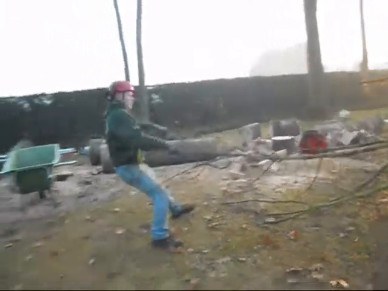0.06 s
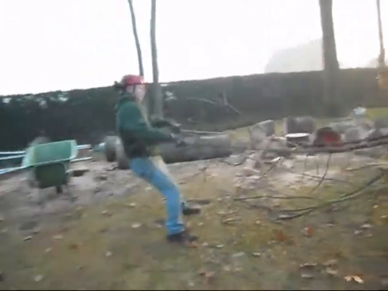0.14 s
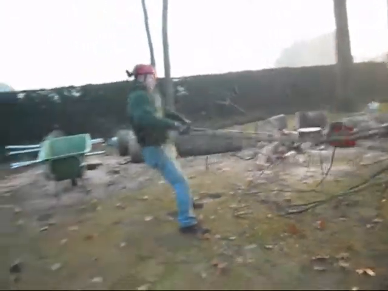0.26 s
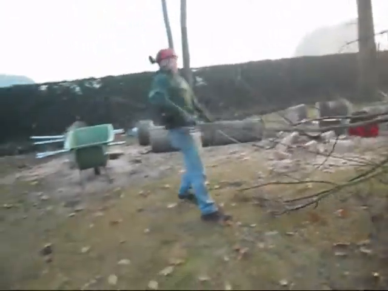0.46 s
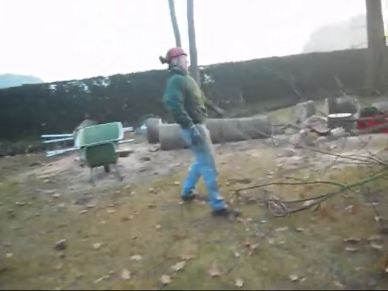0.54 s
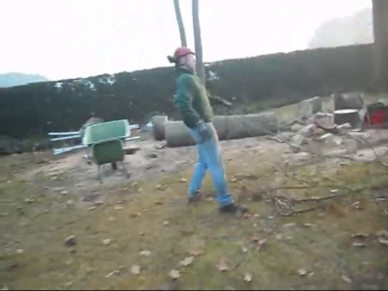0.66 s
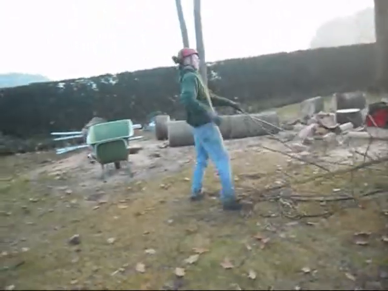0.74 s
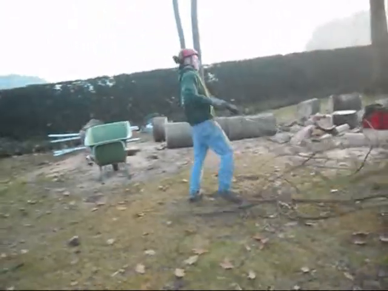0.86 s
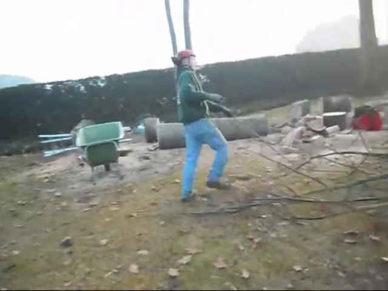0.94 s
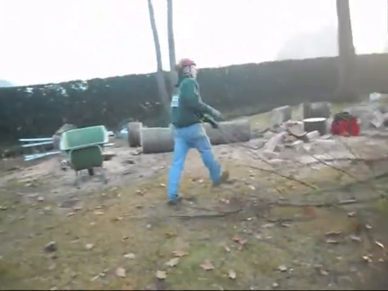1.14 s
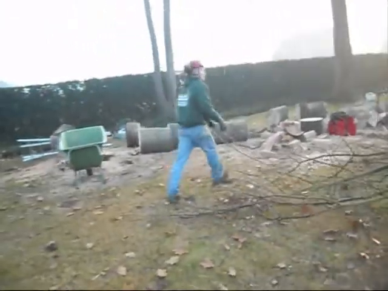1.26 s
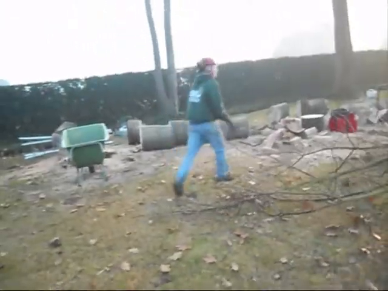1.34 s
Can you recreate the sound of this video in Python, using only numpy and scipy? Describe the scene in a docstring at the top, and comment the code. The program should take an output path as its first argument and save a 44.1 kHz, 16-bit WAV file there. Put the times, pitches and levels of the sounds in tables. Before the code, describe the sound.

A branch breaks outdoors: twigs and leaves swish louder with a few small snaps until one sharp, splintering crack at about 0.4 seconds. The rustle and wind drop right after it. From 0.65 to 0.95 seconds the limb lands with soft low thuds and crunching snaps. A few last twigs break until about 1.1 seconds, as faint wind in the trees and on the microphone slowly returns.

```python
"""Felled branch landing in a yard.

Twigs and leaves swish louder and louder until the wood breaks with one sharp crack: tearing fibres
drive a knock, a ring and a splinter hiss. The limb lands with low thuds and a crunch of snaps,
then a few last twigs break. Wind rushes in the trees and buffets the microphone. After the crack the
recorder's automatic gain, drawn into the level curves, ducks wind and rustle; the wind slowly recovers."""
import sys
import numpy as np
from scipy import signal
from scipy.fft import rfft, irfft
from scipy.io import wavfile

SR = 44100
rng = np.random.default_rng(int(sys.argv[2]) if len(sys.argv) > 2 else 0)


def to_wav(s):
    """Save 16-bit WAV."""
    ch = np.atleast_2d(s).T  # columns
    pcm = np.round(np.clip(ch, -1, 1) * 32767)  # PCM
    wavfile.write(sys.argv[1], SR, pcm.astype(np.int16))


N = 61739
MIC_EDGE_HZ = 10700

# Wood fractures: t/s, split decay/s, knock f/Hz, knock level/dB,
# ring f/Hz, ring width/Hz, ring level/dB, splinter level/dB
FRACTURES = [(0.2261, 0.0071, 910, -31, 3350, 2000, -26, -22),
             (0.3214, 0.0035, 800, -26, 3060, 1200, -20.5, -27),
             (0.3332, 0.0011, 1200, -29, 3000, 1200, -20, -29),
             (.3350, .0003, 1210, -31, 4640, 2200, -15.5, -21.5),
             (0.3378, 0.0017, 1300, -28, 5500, 1500, -22.5, -19.5),
             (0.364, .001, 1100, -33, 6030, 2000, -28, -26),
             (0.3932, 0.00042, 1060, -17.5, 4300, 1280, -2.5, -20),
             (0.3944, 0.0021, 1040, -16.5, 4470, 1400, -14.5, -16),
             (0.6575, 0.00087, 690, -25, 990, 500, -29.5, -46),
             (0.6704, 0.0016, 845, -26, 4000, 2500, -36, -40),
             (.6880, .002, 1310, -31, 1800, 1500, -27.5, -28),
             (0.6947, 0.0011, 1220, -23.5, 1580, 900, -32.5, -26.5),
             (.7060, 0.0035, 706, -30, 1500, 1500, -34, -32),
             (0.7241, 0.00045, 1200, -45, 4200, 2000, -33, -24),
             (0.7288, 0.00062, 1100, -31, 3360, 2000, -38, -21.5),
             (0.7388, 0.0023, 1040, -19, 4670, 2000, -22.5, -24),
             (0.7514, 0.0014, 1000, -25, 2670, 1490, -24, -25.5),
             (.7542, .002, 1100, -26.5, 5460, 2500, -25, -24),
             (.8030, 0.005, 1300, -28.5, 7200, 2500, -46, -25.5),
             (0.8432, .0008, 600, -33.5, 2800, 1500, -31.5, -31),
             (0.902, 0.00038, 1340, -30.5, 8300, 2000, -50, -34),
             (0.9351, 0.004, 1010, -20.5, 1970, 1680, -21, -16.5),
             (0.9882, 0.0034, 1210, -32, 4640, 800, -24.5, -25),
             (1.0229, 0.00056, 3200, -35, 7800, 5000, -20.5, -25.5),
             (1.0620, 0.0011, 1200, -40, 2920, 900, -38, -40),
             (1.1270, 0.00051, 3760, -31, 8300, 1900, -15.5, -34),
             (1.1290, 0.0043, 3100, -34, 4300, 1500, -29, -26)]
# Limb hitting the ground: t/s, level/dB
LANDINGS = [(.658, -30), (.697, -25.5), (.737, -29.5), (.796, -30.5), (.836, -31)]
# Limb modes: f/Hz, level/dB, t60/s
LIMB_MODES = [(169, -3, .08), (237, -1.5, .06), (410, -9, .05), (495, 2, 0.077), (589, 0.5, 0.058)]
# Spectra of brushing twigs, wind in the trees, wind on the microphone: f/Hz, level/dB
RUSTLE_SPECTRUM = [(100, -17), (400, -11.5), (1000, 1), (2000, -4), (3200, 2), (5200, 1), (7500, 0),
                   (10500, -4)]
WIND_SPECTRUM = [(20, -13), (60, -9), (130, -5.5), (280, -4), (480, 0), (850, 1), (1250, -2.5), (2000, -11),
                 (4000, -29), (10500, -42)]
BUFFET_SPECTRUM = [(15, -8), (55, -2.5), (100, -6.5), (200, -18.5), (600, -45)]
# Their levels, ducked by the recorder's automatic gain after the crack at 0.39 s: t/s, level/dB
RUSTLE_DUCKED_DB = [(0, -40.5), (.09, -45.5), (.2, -36), (.28, -30), (.345, -24.5), (.395, -26.5),
                    (.415, -37.5), (.5, -36), (.58, -42), (.65, -43.5), (.7, -38.5), (.755, -38),
                    (.785, -47), (1.04, -44.5), (1.4, -46.5)]
WIND_DUCKED_DB = [(0, -39), (.16, -36), (.39, -29.5), (.42, -45.5), (.6, -42), (.72, -40), (.88, -46.5),
                  (1.08, -46), (1.22, -42.5), (1.4, -39.5)]
BUFFET_DUCKED_DB = [(0, -47), (.08, -43.5), (.39, -41.5), (.43, -58.5), (.95, -56.5), (1.2, -51.5),
                    (1.4, -45.5)]
# Decay of the yard's scatter: f/Hz, t60/s
YARD_DECAY = [(300, 0.12), (1200, 0.2), (4000, 0.063), (10000, 0.075)]


def snap(split_s, knock_hz, knock_db, ring_hz, ring_width_hz, ring_db, splinter_db, size=2048):
    """A first break and a run of tearing fibres knock the wood, ring the twig and spit splinters."""
    t = np.arange(size) / SR
    tear = 0.75 * impulses(size, rate_per_s=8000) * np.exp(-t / split_s)
    tear[0] += 1  # first break
    knock = resonate(tear, knock_hz, width_hz=600)
    ring = resonate(tear, ring_hz, ring_width_hz)
    splinter_band = signal.butter(2, [2540, MIC_EDGE_HZ], "bandpass", fs=SR, output="sos")
    splinters = signal.sosfilt(splinter_band, tear)
    return burst(knock, knock_db) + burst(ring, ring_db) + burst(splinters, splinter_db)


def thud(level_db, attack_s=0.0033, size=8192):
    """The limb lands softly; its low modes die away."""
    t = np.arange(size) / SR
    modes = sum(amp(mode_db - 60 * t / t60_s) * np.sin(2 * np.pi * (hz * t + rng.random()))
                for hz, mode_db, t60_s in LIMB_MODES)
    return burst(modes * np.minimum(t / attack_s, 1), level_db)


def rustle(tick_db=-3, spread_db=4, flutter_db=1):
    """Leaves hiss and small twigs tick, swelling up to the crack, ducked after it."""
    ticks = impulses(N, rate_per_s=1500)
    ticks *= amp(spread_db * np.minimum(rng.exponential(1, N), 4))
    brush = rng.standard_normal(N) + amp(tick_db) * unit_rms(ticks)
    flutter = amp(flutter_db * drift(rate_hz=70))
    return colour(brush, RUSTLE_SPECTRUM) * envelope(RUSTLE_DUCKED_DB) * flutter


def tree_wind(gust_db=1):
    """Wind in the trees: a hollow, wavering rush."""
    gusts = amp(gust_db * drift(rate_hz=25))
    return colour(rng.standard_normal(N), WIND_SPECTRUM) * envelope(WIND_DUCKED_DB) * gusts


def mic_buffet():
    """Wind on the microphone: a low rumble."""
    return colour(rng.standard_normal(N), BUFFET_SPECTRUM) * envelope(BUFFET_DUCKED_DB)


def yard_scatter(x, level_db=-13, size=16384):
    """Ground, logs and hedge scatter a short, thin tail."""
    hz, t, echoes = signal.stft(impulses(size, rate_per_s=4000), SR, nperseg=128)
    decay = amp(-60 * t / at_hz(YARD_DECAY, hz)[:, None])
    tail = signal.istft(echoes * decay, SR)[1]
    return amp(level_db) * signal.fftconvolve(x, tail / np.linalg.norm(tail))[:N]


def amp(db):
    """dB to gain."""
    return 10 ** (np.asarray(db) / 20)


def unit_rms(x):
    """Scale to rms 1."""
    return x / np.sqrt(np.mean(x ** 2) + 1e-20)


def at_hz(table, hz):
    """Interpolate over log frequency."""
    table_hz, values = np.transpose(table)
    return np.interp(np.log(hz + 1), np.log(table_hz), values)


def envelope(table):
    """Gain per sample from t/s, level/dB points."""
    return amp(np.interp(np.arange(N) / SR, *np.transpose(table)))


def colour(x, spectrum):
    """Filter by f/Hz, level/dB points; rms 1."""
    gain = amp(at_hz(spectrum, np.fft.rfftfreq(N, 1 / SR)))
    return unit_rms(irfft(rfft(x) * gain, N))


def drift(rate_hz):
    """Smooth random motion, rms 1."""
    rolloff = np.exp(-(np.fft.rfftfreq(N, 1 / SR) / rate_hz) ** 2)
    return unit_rms(irfft(rfft(rng.standard_normal(N)) * rolloff, N))


def impulses(size, rate_per_s):
    """Clicks of random time and strength."""
    return rng.standard_normal(size) * (rng.random(size) < rate_per_s / SR)


def resonate(x, hz, width_hz):
    """Two damped resonators in series, the second twice as wide."""
    for stage_width_hz in (width_hz, 2 * width_hz):
        r = np.exp(-np.pi * stage_width_hz / SR)
        x = signal.lfilter([1, 0, -1], [1, -2 * r * np.cos(2 * np.pi * hz / SR), r * r], x)
    return x


def burst(x, level_db):
    """Scale to the energy of 1 ms at level_db."""
    return amp(level_db) * x / np.linalg.norm(x) * np.sqrt(SR / 1000)


def add(mix, start_s, sound):
    """Mix in at start_s."""
    part = mix[round(start_s * SR):][:len(sound)]
    part += sound[:len(part)]


def lowpass(x, hz):
    """Steep FIR band limit."""
    taps = signal.firwin(255, hz, window=("kaiser", 9), fs=SR)
    return signal.oaconvolve(x, taps[None], "same")


def scene():
    """Wood snapping and landing in the yard, over rustle and wind; mono."""
    wood = np.zeros(N)
    for start_s, *fracture in FRACTURES:
        add(wood, start_s, snap(*fracture))
    for start_s, level_db in LANDINGS:
        add(wood, start_s, thud(level_db))
    return (wood + yard_scatter(wood) + rustle() + tree_wind() + mic_buffet())[None]


def record(dry):
    """Narrow-band microphone, overload on the loudest crack, final band limit."""
    clipped = np.clip(lowpass(dry, MIC_EDGE_HZ), -1, 1)
    return lowpass(clipped, hz=21770)


dry = scene()
out = record(dry)
to_wav(out)
```